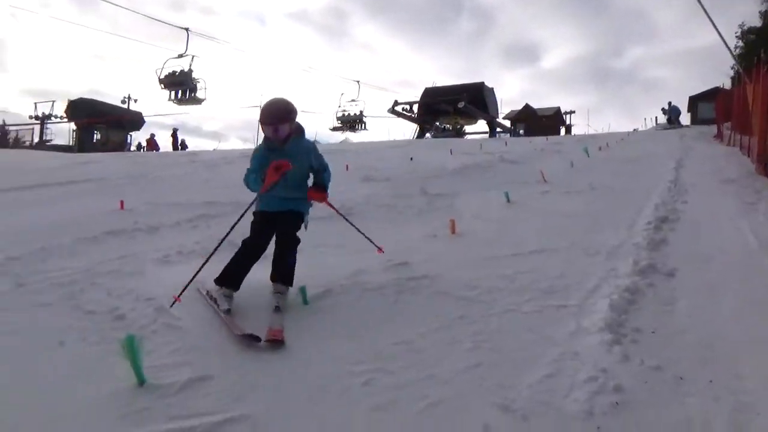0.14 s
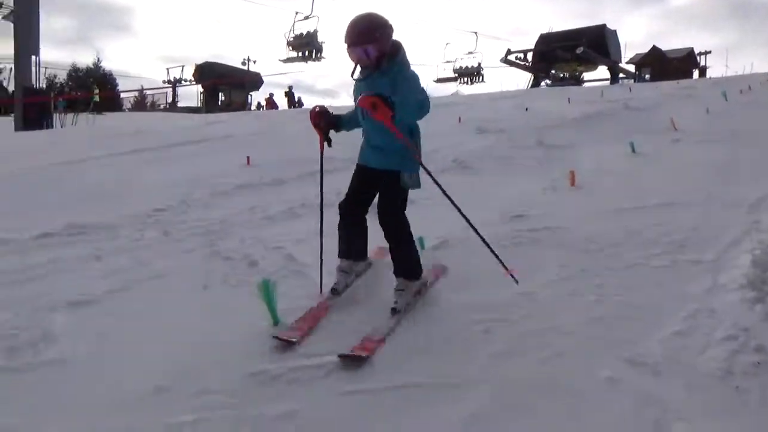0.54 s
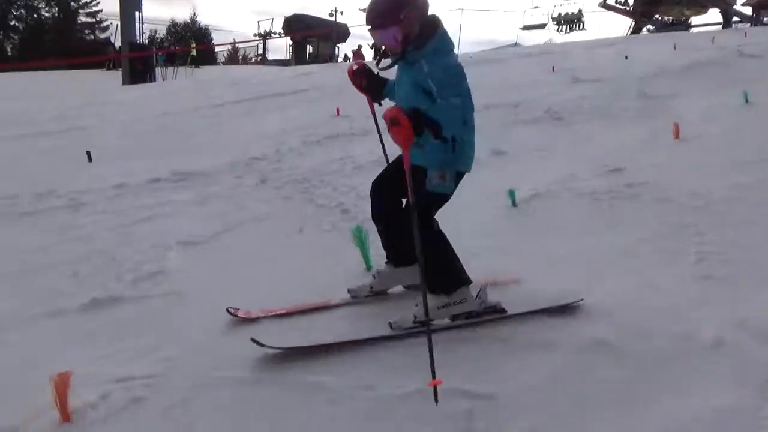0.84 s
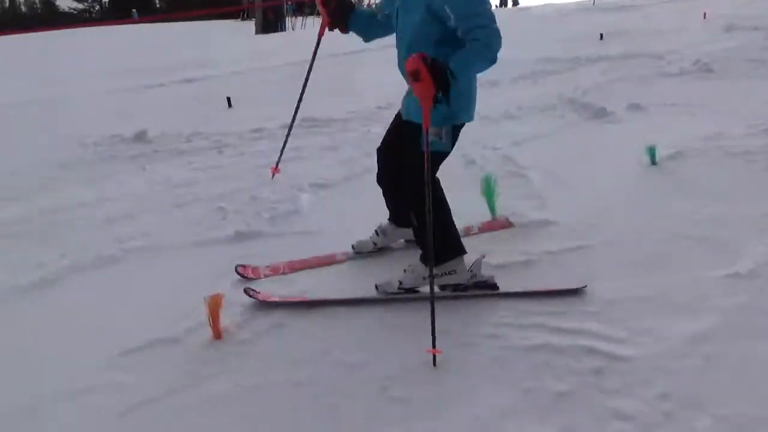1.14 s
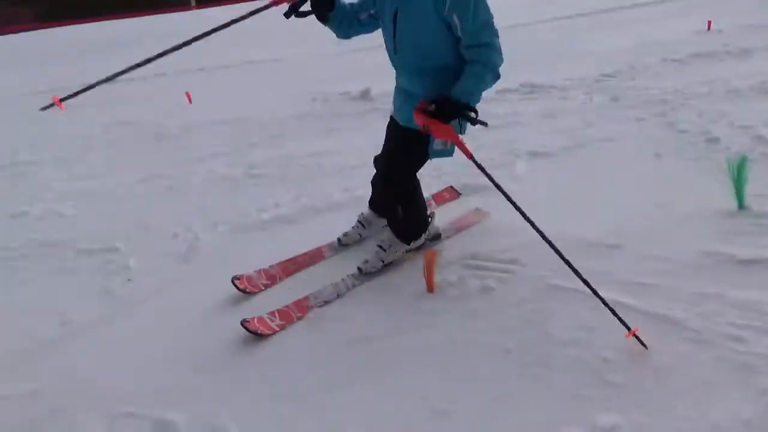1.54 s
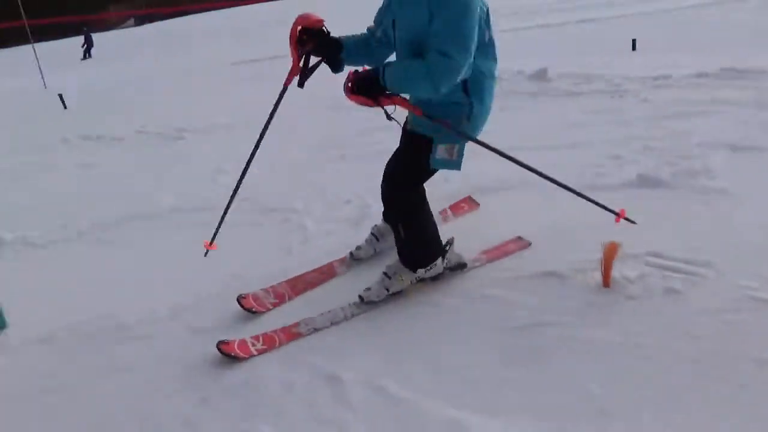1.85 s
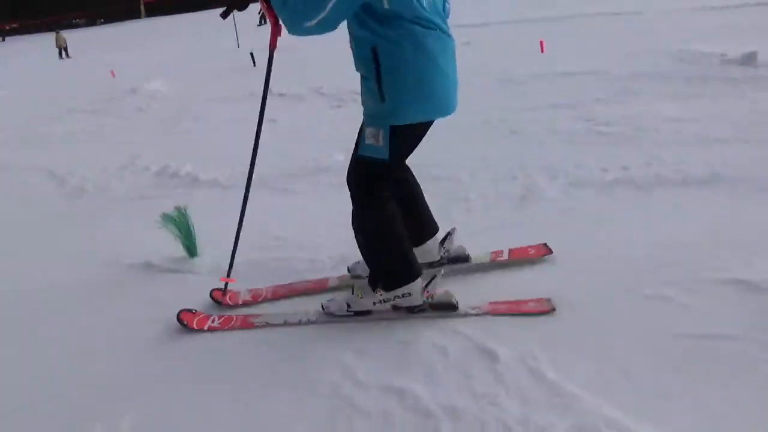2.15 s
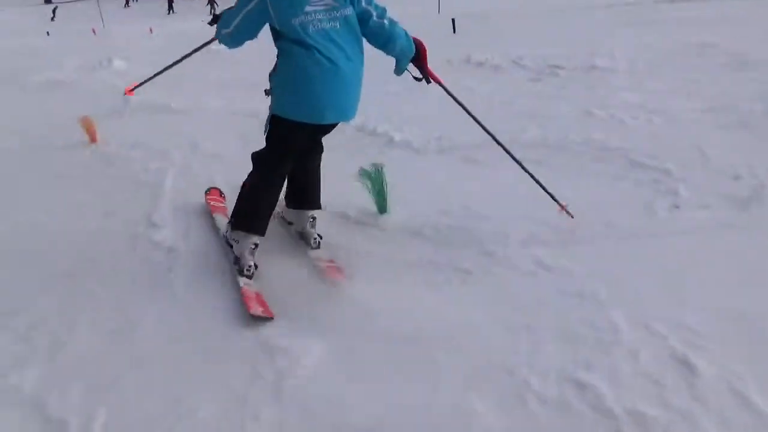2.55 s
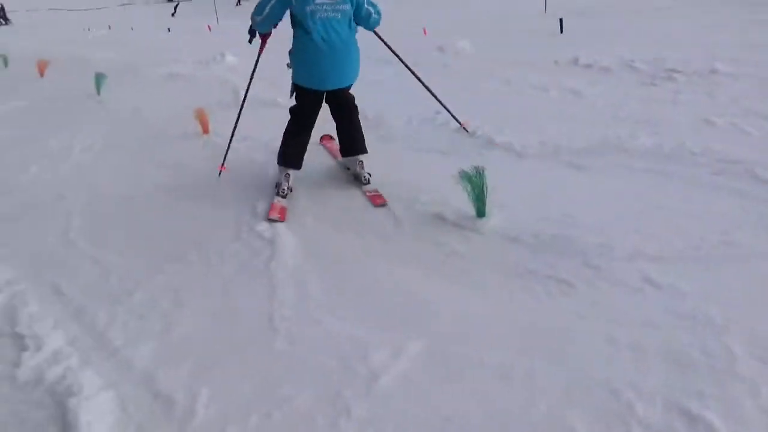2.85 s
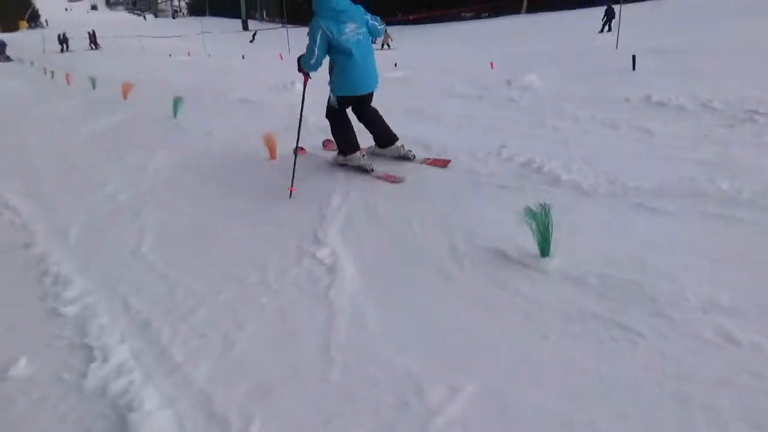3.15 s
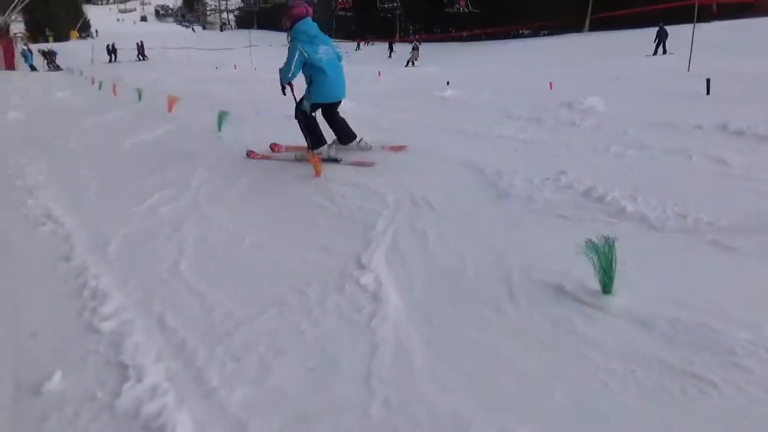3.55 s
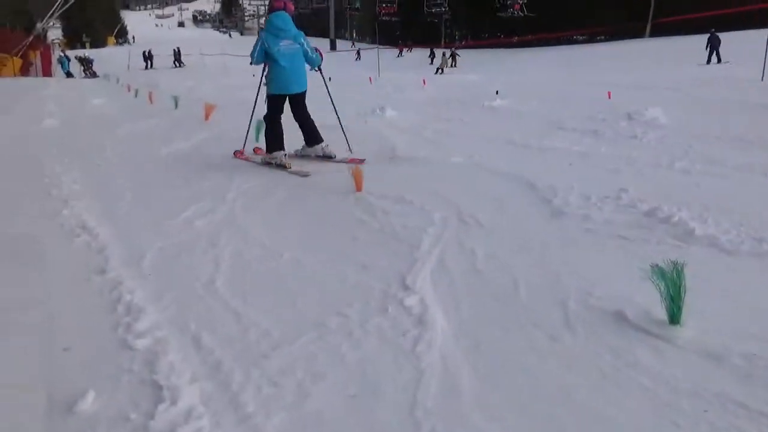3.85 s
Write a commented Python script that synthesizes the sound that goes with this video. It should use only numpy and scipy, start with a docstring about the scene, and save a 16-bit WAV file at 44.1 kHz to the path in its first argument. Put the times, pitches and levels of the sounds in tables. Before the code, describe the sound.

Skis scrape harshly over packed snow close to the microphone, ease off, then skid again in successive turns, with brief dull thumps and a pole rattle between, over faint open air outdoors.

```python
"""On a slope of packed snow, a skier skids through short turns near a microphone.
The edges break snow grains: each grain is a click that rings broad resonances, heard as a low grind,
a rasp, a scrape, a sizzle and a fine spray, whose balance shifts as the skis swing. Ringing poles knock,
dull thumps and short crunches of noise come between, and a low wash of air lies under it all.
The recorder's gain control flattens the loud skids."""
import sys
import numpy as np
from scipy import signal
from scipy.fft import rfft, irfft
from scipy.io import wavfile
from scipy.ndimage import uniform_filter1d

SR = 44100
rng = np.random.default_rng(int(sys.argv[2]) if len(sys.argv) > 2 else 0)


def dump(signal):
    """Clip the signal to [-1, 1] and save it as 16-bit WAV at the path in sys.argv[1]."""
    limited = np.clip(np.atleast_2d(signal).T, -1, 1)
    pcm = np.round(limited * 32767).astype(np.int16)
    wavfile.write(sys.argv[1], SR, pcm)


N = 176400  # samples: 4 s


def amp(db):
    """Turn decibels into a plain factor."""
    return 10 ** (np.asarray(db) / 20)


def rms_one(x):
    """Scale a sound to an average (RMS) strength of 1."""
    return x / np.sqrt(np.mean(x ** 2) + 1e-20)


def in_time(rows):
    """Draw straight lines between the rows (time first), giving one curve per further column."""
    s, *columns = np.transpose(rows)
    return [np.interp(np.arange(N) / SR, s, column) for column in columns]


def at_hz(points, hz):
    """Read a curve of (Hz, value) points at any pitch, along a logarithmic pitch scale."""
    point_hz, values = np.transpose(points)
    return np.interp(np.log(hz), np.log(point_hz), values)


def drift(rate_hz):
    """Slow random wandering with spread 1: noise smoothed twice, so little is left above the rate."""
    r = np.exp(-2 * np.pi * rate_hz / (SR / 10))  # made at a tenth of the sample rate
    noise = rng.standard_normal(N // 10 + 4002)
    slow = signal.lfilter([1], [1, -2 * r, r * r], noise)[4000:]  # skip the filter's start
    return np.interp(np.arange(N) / 10, np.arange(len(slow)), rms_one(slow))


def resonate(x, hz, width_hz):
    """A broad resonance applied twice, for dark valleys between neighbours."""
    r = np.exp(-np.pi * width_hz / SR)
    w = 2 * np.pi * hz / SR
    b = (1 - r * r) / 2 * np.array([1, 0, -1])
    a = [1, -2 * r * np.cos(w), r * r]
    once = signal.lfilter(b, a, x)
    return signal.lfilter(b, a, once)


def ring(clicks, hz, t60):
    """Each unit click starts a sine of height 1 that fades by 60 dB in t60 seconds."""
    r = amp(-60 / (t60 * SR))
    w = 2 * np.pi * hz / SR
    # the tiny offset keeps the filter from slowing down on near-zero numbers
    return signal.lfilter([0, np.sin(w)], [1, -2 * r * np.cos(w), r * r], clicks + 1e-18)


def widen(mid, side, hz):
    """Make stereo: the side sound is added on the left and subtracted on the right."""
    # How much diffuse sound there is. Each row: pitch in Hz, side gain in dB.
    side_gain = [(200, -15), (10600, -16)]
    return mid + amp(at_hz(side_gain, hz)) * side * np.array([[1], [-1]])


def air():
    """Wind and the far slope: a low wash of shaped noise, gusting a little and easing."""
    # Colour of the wash before the top is rolled off. Each row: pitch in Hz, relative level in dB per Hz.
    colour = [(20, -26), (218, -6.5), (389, -10), (900, -2)]
    start_db, fade_db_per_s = -37, 1.68
    gust_db, gust_hz = 2, 11.0
    hz = np.maximum(np.arange(N // 2 + 1) * SR / N, 1)
    roll_off = 1 + (hz / colour[-1][0]) ** 2
    shape = amp(at_hz(colour, hz)) / roll_off
    mid, side = (rfft(rng.standard_normal(N)) * shape for _ in range(2))
    wash = rms_one(irfft(widen(mid, side, hz), N))
    level_db = start_db - fade_db_per_s * np.arange(N) / SR + gust_db * drift(gust_hz)
    return amp(level_db) * wash


def crunches():
    """Snow crunching: short swells of noise in a middle and a treble band."""
    # The crunches. Each row: start in seconds, length in seconds, level in dB, treble over middle in dB.
    crunch_rows = [(1.068, 0.013, -25.5, 5), (2.187, 0.0057, -25.5, 8)]
    # centre and width in Hz; the width is for one pass of the resonance
    low_band, high_band = (1300, 1200), (8900, 3500)
    low = rms_one(resonate(rng.standard_normal(N), *low_band))
    high = rms_one(resonate(rng.standard_normal(N), *high_band))
    out, t = np.zeros(N), np.arange(N) / SR
    for start, length, db, treble_db in crunch_rows:
        progress = np.clip((t - start) / length, 0, 1)
        swell = np.sqrt(np.sin(np.pi * progress).clip(0))
        noise = low * amp(-treble_db / 2) + high * amp(treble_db / 2)
        out += amp(db) * swell * noise
    return out


def poles():
    """Knocks ring the modes of a pole shaft; a tip or ski thumping the snow rings a few cycles."""
    # Knocks on the shaft. Each row: time in seconds, strength in dB, hardness in dB per octave.
    knock_rows = [(1.0036, -25, 7), (1.0048, -14, -1), (1.0075, -18, -2), (2.0112, -27, 10.5),
                  (2.0140, -22, 3)]
    # Ways the shaft rings. Each row: pitch in Hz, relative level in dB, time to fade by 60 dB in seconds.
    shaft_modes = [(1500, -6, 0.0093), (2020, -3, 0.012), (2450, -9, 0.009), (2950, -1, 0.016),
                   (3580, -4, 0.0099), (4300, -3, 0.013), (6000, -1, 0.004), (7600, -3, 0.0044),
                   (9400, -1, .003)]
    # Dull thumps. Each row: time in seconds, starting height in dB before the low cut, pitch in Hz.
    thump_rows = [(0.5603, -8.5, 880), (0.5644, -4.5, 1330), (1.936, -12.5, 1020), (2.255, -19, 270),
                  (2.696, -24, 260)]
    thump_cycles = 5.4  # cycles until a thump has faded by 60 dB
    low_cut_hz = 180
    out = np.zeros(N)
    times, knock_db, hardness = np.transpose(knock_rows)
    for hz, mode_db, t60 in shaft_modes:
        # a harder knock favours the modes above the fourth one
        hard_db = hardness * np.log2(hz / shaft_modes[3][0])
        signs = rng.choice([-1, 1], len(times))
        clicks = np.zeros(N)
        clicks[(times * SR).astype(int)] = amp(knock_db + mode_db + hard_db) * signs
        out += ring(clicks, hz, t60)
    for start, db, hz in thump_rows:
        click = amp(db) * (np.arange(N) == int(start * SR))
        out += ring(click, hz, thump_cycles / hz)
    low_cut = signal.butter(2, low_cut_hz, "high", fs=SR, output="sos")
    return signal.sosfilt(low_cut, out)


def snow_grains(level_db):
    """Four streams of clicks: grains break at random, more often when the skid is louder."""
    grains_per_s = 9000  # at the loudest
    spread_db = 1.5
    follow = .3  # share of the level's swing that the grain rate follows
    sizes = amp(spread_db * np.minimum(rng.exponential(1, (4, N)), 5))
    signs = rng.choice([-1, 1], (4, N))
    rate = amp(follow * (level_db - level_db.max()))
    breaks = rng.random((4, N)) < grains_per_s * rate / SR
    return sizes * signs * breaks / np.sqrt(rate)  # fewer grains are made bigger, for even power


def skid():
    """Breaking snow grains set off the broad resonances of every part of the skid."""
    # Pressure of the edges. Each row: time in seconds, skid level in dB before gain control.
    edge_pressure = [(0, -15), (.22, -15), (.3, -20.5), (.37, -26.5), (.49, -30.5), (.57, -27), (.62, -22),
                     (.655, -15), (.9, -15), (.95, -22.5), (.975, -36), (1.05, -34), (1.1, -29.5),
                     (1.3, -25.5), (1.37, -21), (1.46, -21), (1.51, -15), (1.86, -15), (1.92, -24),
                     (1.96, -30.5), (2.13, -31), (2.2, -25), (2.3, -15.5), (2.72, -15.5), (2.83, -27),
                     (2.95, -28), (3.035, -40), (3.11, -27), (3.29, -17), (3.48, -16), (3.5, -22.5),
                     (3.59, -23), (3.72, -29.5), (3.79, -37), (3.91, -39), (4, -32)]
    # Balance of the parts. Each row: time in seconds, then grind, rasp, scrape, sizzle and spray
    # in relative dB, then left over right in dB before each part's share.
    balance = [(0, -19.5, -9, -2, -6.5, -8, 1.8), (0.28, -17.5, -10.5, -1.5, -8, -10.5, 1.5),
               (0.45, -30, -17.5, -11.5, -16.5, -12.5, 3.5), (0.63, -19.5, -13.5, -11.5, -11, -13, 0.5),
               (0.68, -16.5, -12.5, -2.5, -4, -8, -1), (0.74, -20.5, -8.5, -8.5, -5.5, -2.5, -0.8),
               (0.92, -16.5, -9.5, -11.5, -13, -10, -0.5), (1.04, -14.5, -13, -11.5, -16, -10.5, 6.5),
               (1.2, -15.5, -15, -13, -10.5, -6, -0.5), (1.38, -14.5, -10.5, -14, -14.5, -11.5, -1),
               (1.55, -19, -11, -11.5, -8.5, -4, 0.1), (1.85, -8, -6.5, -8, -9.5, -4, 0.5),
               (2.07, -21, -8.5, -10.5, -7, -3, 1.5), (2.3, -14, -10.5, -5, -1.5, 1.5, -0.1),
               (2.53, -30, -15, -1.5, -1, -5.5, 1.5), (2.76, -13.5, -6, 1, -6, -8, 2),
               (2.93, -20.5, -12, -7, -14, -13.5, 2.2), (3.08, -18, -10, -7.5, -8.5, -9, -0.3),
               (3.42, -12.5, -7.5, -7.0, -3, -3, 0), (3.7, -9.5, -6.5, -7.5, -7.5, -7.5, 1.5),
               (4, -15.5, -11, -4, -6, -8.5, 3)]
    # Resonances of the parts. Each row: centre in Hz, width in Hz for one pass, relative level in dB.
    grind = [(198, 143, -6.5), (289, 247, -7), (577, 470, -2)]
    rasp = [(924, 580, -1.7), (1322, 400, 1), (1750, 730, -1.7)]
    scrape = [(2486, 1130, 0.025), (3156, 810, 0), (3870, 1450, 0)]
    sizzle = [(5760, 1400, -0.8), (6770, 2000, -1.2)]
    spray = [(8690, 1480, 0.042), (9910, 1280, 0)]
    # Patchiness of the snow. One number per part, grind to spray: spread of its level in dB.
    patchiness = [2.1, 1.6, 1.3, 1.2, 1.1]
    # How far each part follows the left-right column. One number per part, grind to spray: a factor.
    pan_shares = [0.15, 1.5, 0.89, 1.5, 0.56]
    # How far left runs ahead of right. Each row: pitch in Hz, lead in radians.
    left_lead = [(600, 0.48), (3000, 0.11)]
    patch_hz = 20
    chatter_db, chatter_hz = 0.92, 89  # flutter shared by all parts

    level_db, = in_time(edge_pressure)
    *parts_db, pan_db = in_time(balance)
    parts_db = parts_db - 10 * np.log10(np.sum(amp(parts_db) ** 2, axis=0))  # the parts share the level
    grains = snow_grains(level_db)
    parts = [grind, rasp, scrape, sizzle, spray]
    out, first = 0, 0
    for part, part_db, share, patch_db in zip(parts, parts_db, pan_shares, patchiness):
        sound = 0
        for hz, width_hz, db in part:
            first = 2 - first  # neighbouring resonances use different grains
            mid, side = resonate(grains[first:first + 2], hz, width_hz)
            # the slope of a wave runs a quarter cycle ahead of it: added left, subtracted right
            quarter_ahead = np.gradient(mid) / np.sin(2 * np.pi * hz / SR)
            lead = quarter_ahead * np.tan(at_hz(left_lead, hz) / 2) * [[1], [-1]]
            patches = amp(db + patch_db * drift(patch_hz))
            sound = sound + patches * (widen(mid, side, hz) + lead)
        left_right_db = share * np.outer([.5, -.5], pan_db)
        out = out + amp(part_db + left_right_db) * rms_one(sound)
    return out * amp(level_db + chatter_db * drift(chatter_hz))


def scene():
    """The air, the crunches, the poles and the skid together."""
    return air() + crunches() + poles() + skid()


def record(dry):
    """The recorder's gain control holds loud passages near a ceiling; then the top is cut."""
    ceiling_db, release_db_per_s, sense_s = -16, 76, 0.011
    cutoff_hz = 11120
    size = int(sense_s * SR)
    power = uniform_filter1d(np.mean(dry ** 2, axis=0), size=size)
    db = 10 * np.log10(power + 1e-12)
    # the held level jumps up with the sound but sinks only at the release speed
    fall = release_db_per_s * np.arange(N) / SR
    held = np.maximum.accumulate(db + fall) - fall
    gain = amp(uniform_filter1d(np.minimum(ceiling_db - held, 0), size=size))
    top_cut = signal.ellip(14, .5, 75, cutoff_hz, fs=SR, output="sos")
    return signal.sosfilt(top_cut, dry * gain)


dry = scene()
out = record(dry)
dump(out)
```